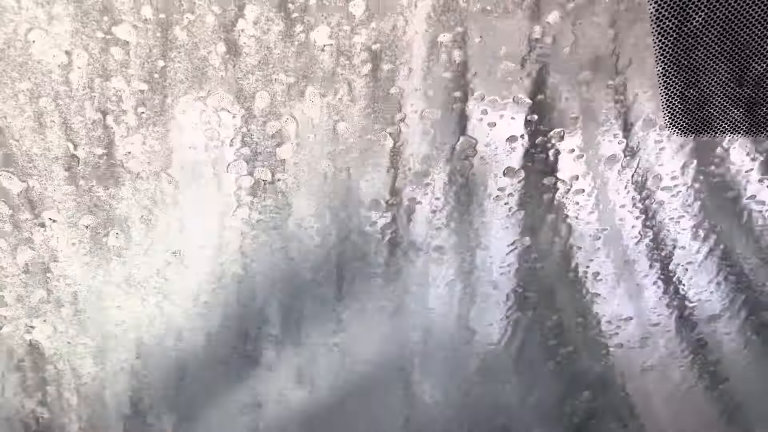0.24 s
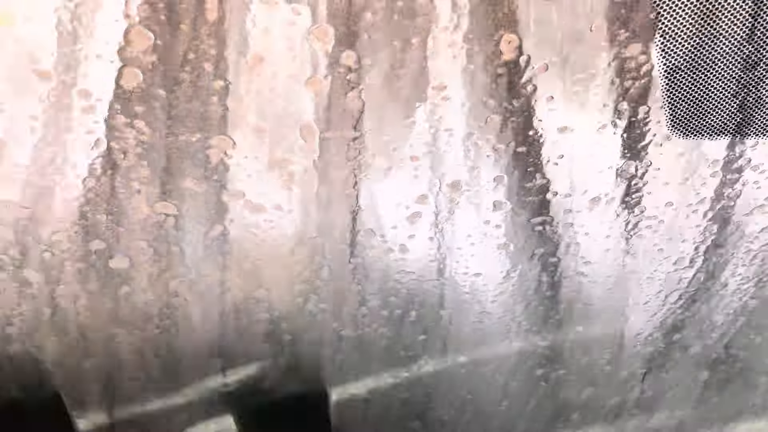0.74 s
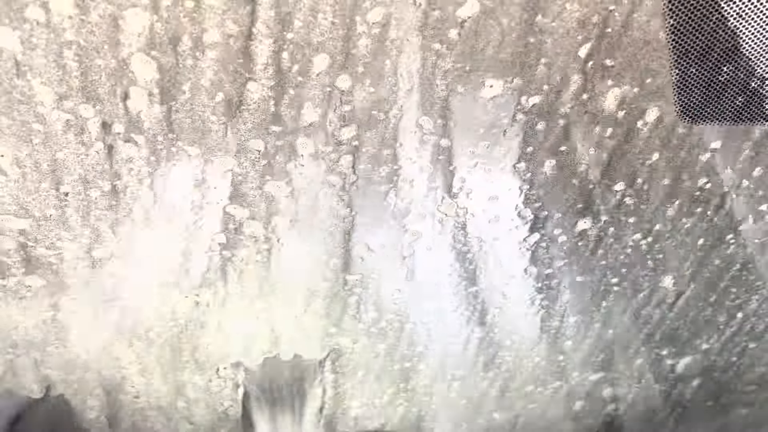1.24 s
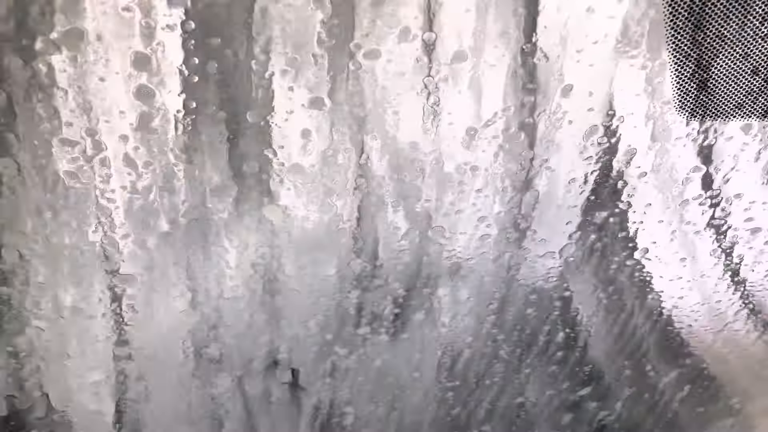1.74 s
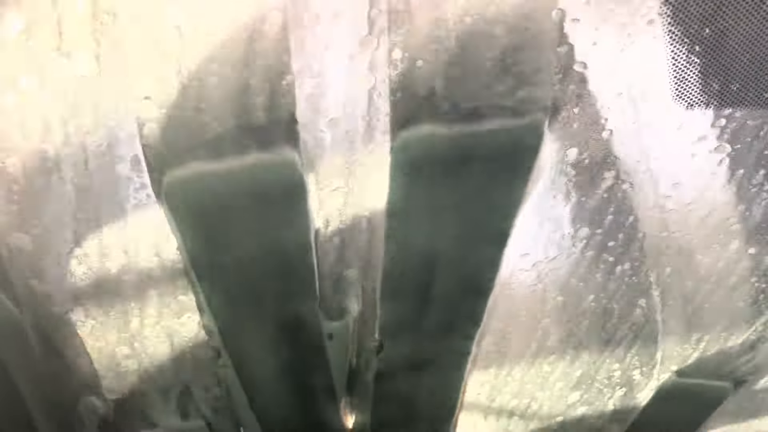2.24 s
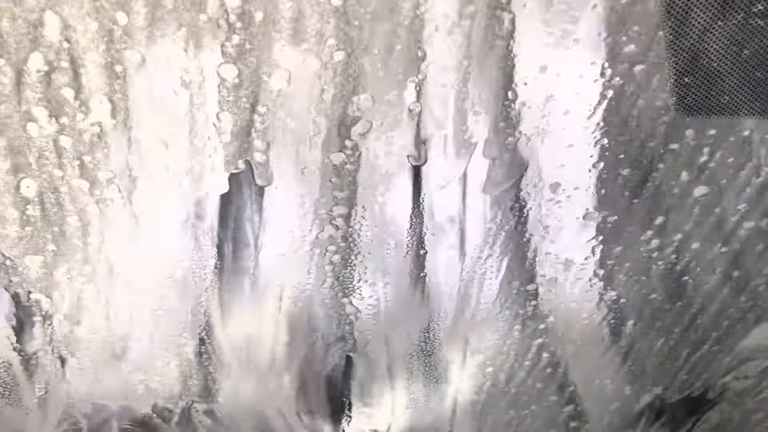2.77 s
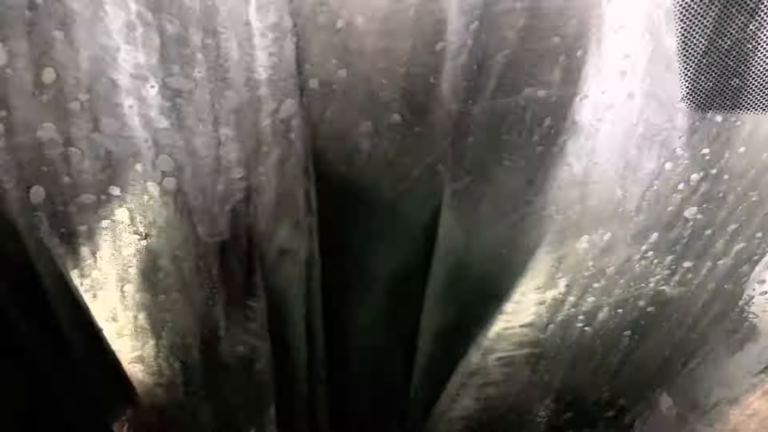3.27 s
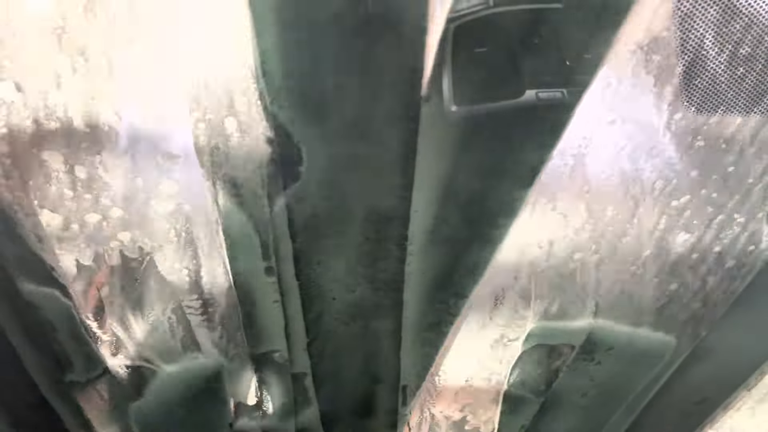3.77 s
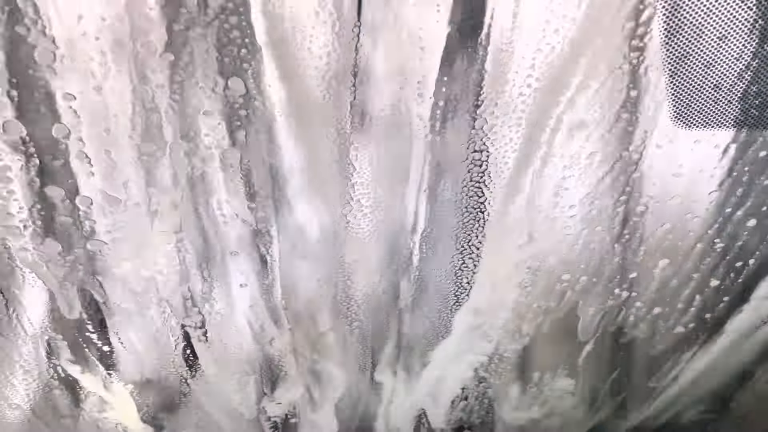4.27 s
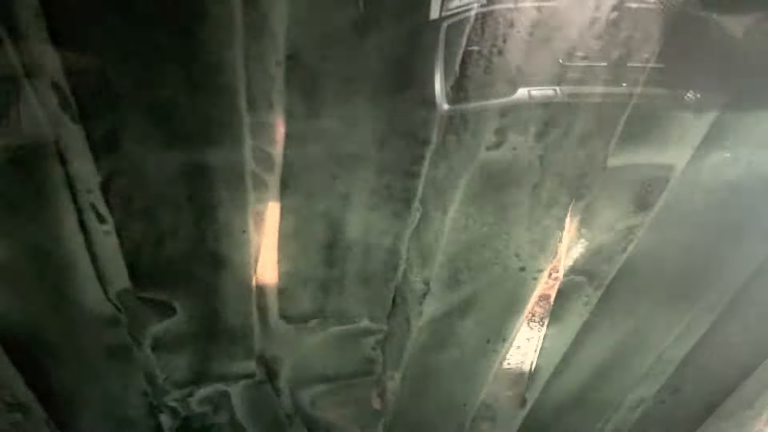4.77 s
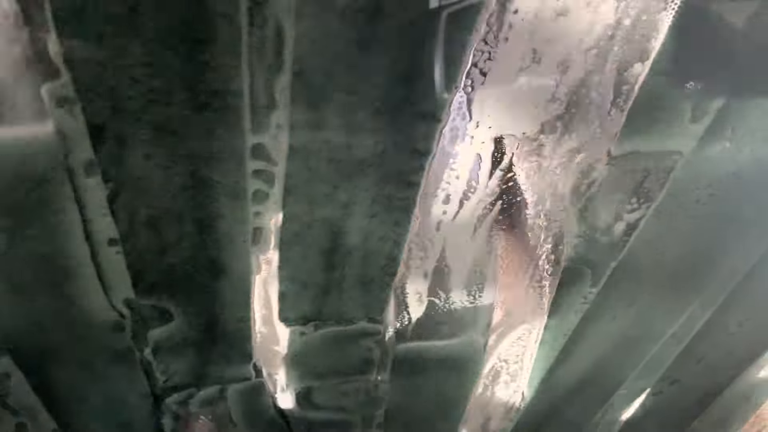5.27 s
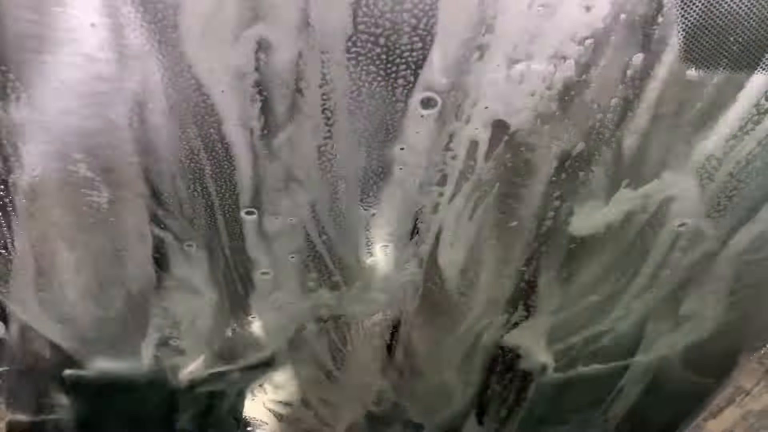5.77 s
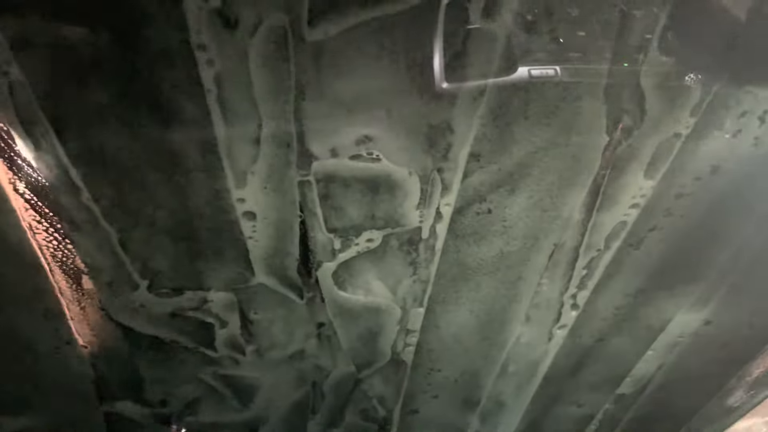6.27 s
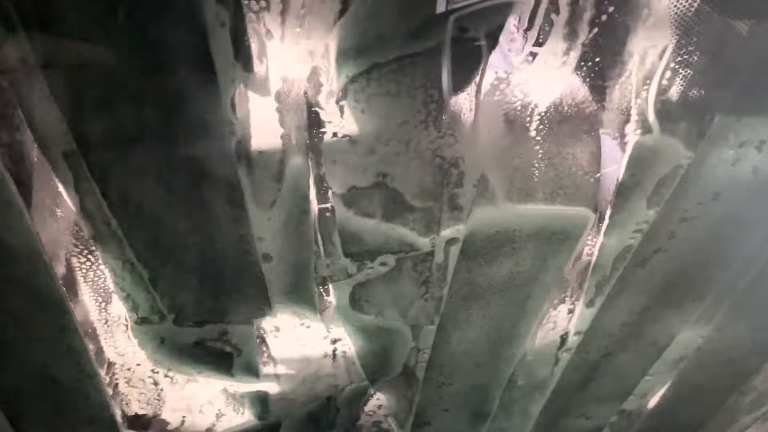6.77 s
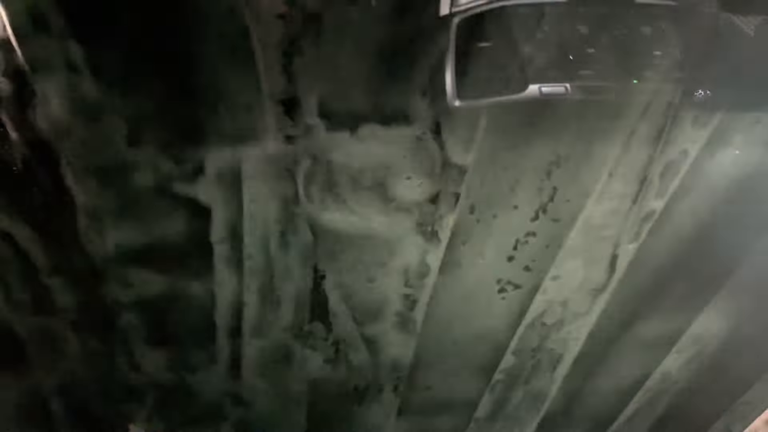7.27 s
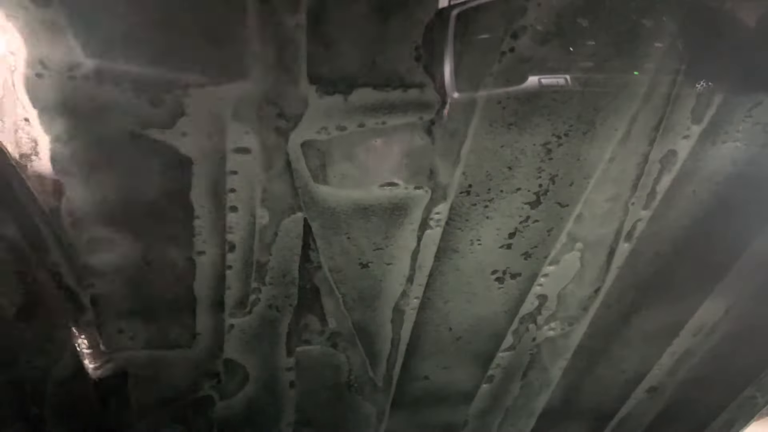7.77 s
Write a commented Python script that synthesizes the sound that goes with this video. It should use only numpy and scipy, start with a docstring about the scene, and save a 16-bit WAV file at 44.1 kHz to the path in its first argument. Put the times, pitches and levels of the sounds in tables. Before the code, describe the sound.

Wet cloth strips slap and thump irregularly on a car's windscreen and roof, heard from inside over low machinery rumble and faint water hiss.

```python
"""Inside a car in an automatic wash

Wet cloth strips slap the windscreen: swelling pops join noisy patter that is filtered by its resonances. They
thump on the roof, which rings in damped modes, then scrape and drag over the glass as shaped noise. Machinery
rumbles through the closed cabin as low noise, and the hiss of the water spray, also filtered noise, slowly
falls behind."""
import sys
import numpy as np
from scipy import signal
from scipy.fft import rfft, irfft
from scipy.io import wavfile
from scipy.ndimage import uniform_filter1d, minimum_filter1d

SR = 44100
rng = np.random.default_rng(int(sys.argv[2]) if len(sys.argv) > 2 else 0)


def generate_wav(signal):
    """Clip the signal to [-1, 1] and save it as 16-bit WAV at the path in sys.argv[1]."""
    frames = np.transpose(np.atleast_2d(signal))
    scaled = np.clip(frames, -1, 1) * 32767
    pcm = np.round(scaled).astype(np.int16)
    wavfile.write(sys.argv[1], SR, pcm)


N = 353726

# Machinery through the body shell, swelling as the curtain swings against the car.
# Each row: time in seconds, level in dB.
RUMBLE_LEVEL = [(0, -35.5), (.2, -36), (.5, -39), (.95, -31), (1.25, -34), (1.5, -32), (1.8, -36.5),
                (2.2, -32), (2.75, -33), (3.15, -35), (3.5, -36), (3.85, -35), (4.15, -34), (5.1, -32.5),
                (5.4, -37), (6.1, -27.5), (6.7, -36.5), (7.1, -31.5), (7.55, -30.5), (8.02, -36)]
# Colour of the rumble. Each row: frequency in Hz, relative level in dB.
RUMBLE_COLOUR = [(15, -42), (24, -20), (32, -22.5), (41, 1), (50, 1), (62, -3), (76, -2), (100, -7.5),
                 (125, -4), (152, -5), (180, -12), (225, -23.5), (300, -24.5), (600, -83.5)]
# The curtain's weight rocks the whole body, which shudders on.
# Each row: start in seconds, level in dB before the rise and decay.
SHUDDERS = [(.03, -25), (2.02, -19), (2.39, -18), (3.31, -10), (3.37, -17), (3.68, -25), (4.26, -22),
            (4.61, -14), (4.95, -15.5), (5.12, -21.5), (5.95, -21.5), (6.26, -23.5), (6.79, -24),
            (7.27, -14), (7.35, -31), (7.61, -22.5)]
# Water spray, falling behind. Each row: time in seconds, relative level in dB.
SPRAY_LEVEL = [(0, -54), (.62, -53.5), (.95, -57.5), (4.5, -58), (6.3, -61), (6.75, -59.5), (8.02, -59)]
# Colour of the spray. Each row: frequency in Hz, relative level in dB.
SPRAY_COLOUR = [(1500, 1), (2600, -3), (3600, -4), (4500, 0), (5200, -2.5), (5480, -6.5), (5740, -16.5),
                (5880, -2), (6400, -5), (6950, -5), (7200, -12), (7780, -16.5), (8020, -9), (8900, -11.5),
                (9700, -20), (12000, -45)]
# Colour of the fine mist. Each row: frequency in Hz, relative level in dB.
MIST_COLOUR = [(7000, -31.5), (9500, 8.5), (11500, 8.5), (13000, 3.5), (15000, 9.5), (16000, -5.5)]
# Passing jets. Each row: loudest moment in seconds, level in dB, width (standard deviation) in seconds.
JETS = [(.085, -55, 0.035), (.605, -52, .017)]
# Cloth dragging over the glass. Each row: time in seconds, relative level in dB.
DRAG_LEVEL = [(0, -40.5), (.55, -43), (1.05, -41), (1.8, -43), (3.0, -44), (5.05, -43.5), (5.45, -43.5),
              (6.7, -43.5), (7.6, -45.5), (8.02, -45.5)]
# Colour of the drag. Each row: frequency in Hz, relative level in dB.
DRAG_COLOUR = [(110, -67), (180, 1), (200, -11.5), (227, -6.5), (363, -3.5), (450, -10), (626, -10),
               (712, -11.5), (960, -12.5), (1290, -19), (1550, -15.5), (1900, -25.5), (4000, -29.5),
               (5200, -48.5), (8800, -120)]
# Colour of the door and roof panels. Each row: frequency in Hz, relative level in dB.
PANEL_COLOUR = [(70, -31), (110, -2.5), (200, -7.5), (270, -8.5), (380, -5.5), (520, -13.5), (800, -22),
                (1500, -61)]
# A strip's weight falls on the roof.
# Each row: start in seconds, level in dB, frequency driven hardest in Hz.
THUMPS = [(.045, -20.5, 61.6), (0.073, -28.5, 188), (0.122, -25, 52), (.712, -12, 211), (0.729, -7.5, 122),
          (1.15, -27.5, 165), (1.436, -21, 129), (1.957, -11, 190.5), (2.003, -10, 107), (2.035, -12, 161),
          (2.071, -13, 88), (2.403, -12, 86.7), (2.425, -18, 55), (2.76, -27.5, 60), (2.983, -25.5, 126),
          (3.297, -8.5, 121), (3.312, -11.5, 112), (3.346, -5.5, 199), (3.363, -15.5, 96),
          (3.398, -15.5, 60), (3.678, -17.5, 112), (3.699, -16.5, 200), (4.034, -19, 69), (4.266, -17, 80),
          (4.35, -19.5, 120), (4.521, -19.5, 67.7), (4.601, -15, 167), (4.633, -10.5, 70), (4.711, -17, 93),
          (4.959, -10, 60), (4.972, -18, 139), (5.125, -27, 131), (5.129, -16.5, 79.4), (5.685, -25.5, 99),
          (5.774, -23.5, 120), (5.895, -15, 165), (6.015, -21.5, 95.3), (6.238, -18.5, 105),
          (6.299, -20, 50.4), (6.8, -22, 94.5), (7.056, -31.5, 196), (7.235, -15.5, 133), (7.322, -10, 178),
          (7.353, -21, 75), (7.466, -22, 109), (7.604, -16.5, 153), (7.628, -18, 53.5), (7.671, -24, 99),
          (7.765, -19.5, 109.5)]
# Modes of the roof and the cabin air.
# Each row: mean frequency in Hz, relative level in dB, 60 dB decay time in seconds.
ROOF_MODES = [(50.5, -25, 0.5), (60, -13.5, 1), (73, -12, 0.67), (88.9, 2, 0.4), (118.6, -1, 0.24),
              (150.4, 3.5, 0.38), (175, 8.5, 0.11), (199, -7, 0.066), (225, -1, 0.086)]
# A wiping strip squeezes out a crackle of water.
# Each row: loudest moment in seconds, level in dB, width (standard deviation) in seconds.
SQUIRTS = [(2.003, -41, 0.0065), (3.316, -32, 0.005), (3.374, -37, 0.0089), (3.70, -59, 0.015),
           (4.63, -40, .018), (4.955, -53, 0.013), (5.05, -47.5, 0.0086), (5.082, -51, 0.0065),
           (5.124, -40, 0.0046), (5.68, -60, .012), (5.876, -53, 0.0056), (5.903, -46, 0.012),
           (7.194, -51, .008), (7.325, -44, 0.025), (7.59, -52.5, 0.025)]
# Colour of that crackle. Each row: frequency in Hz, relative level in dB.
SQUIRT_COLOUR = [(800, -30), (1700, -1), (2200, 5), (2800, -3.5), (3600, -1.5), (4800, -10), (6000, -21),
                 (9000, -41)]
# A strip scrapes along the glass.
# Each row: loudest moment in seconds, relative level in dB, width (standard deviation) in seconds.
SCRAPES = [(.08, -40.5, 0.035), (.735, -40, 0.015), (.91, -48, 0.026), (2.01, -28, 0.02),
           (2.405, -28.5, 0.019), (3.31, -22, 0.019), (3.377, -27.5, 0.0091), (3.691, -35, 0.041),
           (4.604, -29, 0.019), (4.645, -30.5, 0.012), (4.72, -34.5, 0.053), (4.96, -33, 0.018),
           (5.06, -38.5, 0.051), (5.682, -38, 0.013), (5.875, -35, 0.0077), (5.912, -26.5, 0.019),
           (5.982, -47, 0.0081), (6.025, -37.5, 0.071), (6.28, -32, 0.019), (6.45, -43.5, 0.032),
           (6.91, -41.5, 0.031), (7.07, -54, 0.02), (7.197, -30, 0.012), (7.25, -33.5, 0.019),
           (7.315, -29.5, 0.02), (7.385, -36, 0.013), (7.585, -36.5, 0.015), (7.68, -39, 0.037)]
# Colour of a scrape. Each row: frequency in Hz, relative level in dB.
SCRAPE_COLOUR = [(150, -30), (250, -13.5), (360, 3.5), (520, -1.5), (730, -1), (880, -0.5), (1120, -8.5),
                 (1320, -16), (1550, -11.5), (1850, -18.5), (2700, -19), (4000, -25.5), (5500, -32),
                 (9000, -48), (15000, -58)]
# A strip lands on the glass. Each row: start in seconds, clap level in dB, clap pitch in Hz,
# knock level of the pane in dB, knock pitch in Hz, wet smack level in dB, smack pitch in Hz,
# relative time to lie flat in seconds, left-right difference in dB.
SLAPS = [(.7072, -19, 920, -20, 388, -38, 2380, .0035, 10),
         (.7122, -9.5, 750, -10.5, 387, -29, 3560, 0.0019, 6.5),
         (.7252, -12, 637, -16, 423, -31.5, 2680, 0.0035, 5),
         (.808, -29.5, 755, -42, 370, -39.5, 2920, 0.0026, 4),
         (1.107, -26.5, 940, -27, 330, -45, 1500, 0.0068, -1),
         (1.495, -34.5, 710, -30.5, 370, -48, 1600, .006, -4),
         (1.9555, -12, 1115, -12, 416, -25, 2640, 0.0042, 4),
         (1.9725, -15.5, 594, -18, 378, -46, 1500, 0.0017, 9.5),
         (1.988, -37, 800, -33, 370, -37, 1980, 0.0022, 6), (1.999, -29, 700, -26, 355, -40, 3670, .007, 6),
         (2.0305, -17, 644, -6.5, 363, -27, 2220, 0.0032, 4),
         (2.063, -20, 960, -16.5, 387, -29, 3220, 0.0096, 2.5),
         (2.1, -26, 660, -29, 370, -46, 1500, 0.0035, 4),
         (2.384, -24.5, 880, -19.5, 356, -40, 1520, 0.01, -2),
         (2.399, -30, 1030, -27, 367, -40, 1500, .0028, 2),
         (2.424, -26, 613, -21, 370, -42, 1500, 0.0057, -1),
         (3.269, -36.5, 743, -27, 370, -63, 1500, 0.01, 8),
         (3.3082, -9, 720, -9.5, 398, -32, 2720, 0.0024, 3.5),
         (3.3145, -14.5, 650, -20, 371, -27, 1550, 0.0018, 7),
         (3.339, -22, 800, -24, 394, -31, 1770, .002, 4),
         (3.3435, -14.5, 743, -14, 343, -27.5, 2220, 0.0053, 7),
         (3.3698, -20.5, 850, -17, 353, -25.5, 2660, 0.0017, 4),
         (3.379, -32, 610, -20, 370, -32.5, 3400, .003, 1.5),
         (3.663, -30, 900, -23, 244, -39, 1490, 0.0093, 7),
         (3.678, -34, 800, -26, 370, -48, 2080, 0.0047, -5),
         (3.703, -21, 880, -21.5, 355, -34.5, 1950, 0.0086, -1),
         (4.586, -21.5, 986, -25.5, 437, -31.5, 1500, 0.0044, 6),
         (4.605, -36, 710, -21, 225, -53, 1600, .004, 3),
         (4.622, -21, 617, -15, 402, -30, 2740, 0.0024, 4.5),
         (4.628, -26, 790, -14.5, 374, -41, 2230, .0025, -3),
         (4.641, -31, 850, -31, 400, -41, 2230, .003, 2), (4.655, -33, 800, -37, 380, -38, 2600, .002, 7),
         (4.684, -32, 950, -29, 370, -43, 2200, 0.0042, 7),
         (4.715, -28.5, 667, -24, 340, -39, 2230, 0.0038, 6),
         (4.745, -26, 720, -22, 370, -48, 2670, 0.01, 4),
         (4.94, -25, 735, -22.5, 262, -38, 2200, 0.016, -2),
         (4.969, -26, 900, -22, 220, -38.5, 2370, 0.0035, -3),
         (5.12, -16, 550, -16.5, 340, -33, 1780, 0.0026, 0.5),
         (5.534, -29, 650, -53, 370, -37, 1350, 0.0049, 5),
         (5.677, -31, 846, -34, 370, -45, 2420, 0.014, 3),
         (5.889, -19.5, 540, -23.5, 433, -32, 1980, 0.0072, 6),
         (5.911, -24, 640, -19.5, 473, -45, 1610, 0.0076, 8),
         (5.933, -25, 980, -20, 333, -30.5, 1490, .005, 4),
         (5.958, -27, 550, -35, 456, -32.5, 1440, 0.0029, 5),
         (6.012, -21.5, 726, -16.5, 347, -34, 2390, .009, 3.5),
         (6.03, -25, 740, -43, 385, -31, 1530, .004, 4.5),
         (6.259, -41, 1065, -27, 410, -36.5, 1710, 0.0046, 2),
         (6.279, -43, 1100, -27, 435, -34, 2770, 0.0044, 5),
         (6.435, -35, 960, -30.5, 370, -56, 1580, 0.0068, -2),
         (6.459, -35, 694, -36, 370, -61, 1580, .003, -4),
         (6.672, -23.5, 624, -33, 370, -66, 1490, 0.0015, 7),
         (6.84, -40, 800, -46, 370, -43, 2870, .003, 5), (6.992, -41, 875, -39, 370, -57, 1600, .003, 2),
         (7.039, -28, 737, -32, 360, -45, 1500, 0.015, 6.5),
         (7.068, -28, 560, -23, 437, -62, 1580, 0.016, 5),
         (7.117, -38, 1020, -40, 370, -50, 1630, .0027, 3),
         (7.189, -22.5, 726, -23, 387, -36, 2300, 0.0085, 3),
         (7.233, -24, 650, -38, 232, -31.5, 1600, 0.0066, 8),
         (7.296, -28, 592, -17, 225, -44, 1450, 0.0095, 4),
         (7.3225, -28, 720, -8, 333, -41, 2400, 0.0017, 3.5),
         (7.384, -34, 930, -36, 370, -38, 2600, .003, 5),
         (7.392, -26.5, 756, -40, 370, -44, 2300, 0.0017, 4),
         (7.455, -34, 834, -40, 370, -59, 1500, 0.0025, 2),
         (7.54, -42, 748, -27, 232, -37.5, 1890, 0.0033, 5),
         (7.572, -54, 600, -33, 370, -39, 2200, 0.0085, 3),
         (7.597, -34, 1044, -30, 443, -39.5, 1650, 0.0089, 3),
         (7.659, -38, 700, -40, 370, -48, 3530, 0.0033, 2),
         (7.678, -38, 975, -19, 303, -44, 2720, 0.0055, 1),
         (7.703, -42, 1000, -32, 370, -52, 1710, 0.005, 1),
         (7.757, -28.5, 960, -39, 370, -50, 1480, 0.0082, -1)]
# Colour of the struck windscreen. Each row: frequency in Hz, relative level in dB.
GLASS_COLOUR = [(120, -29), (200, 3.5), (279, -0.5), (372, -3), (512, -14), (738, -3.5), (852, -15),
                (1150, -24.5), (1310, -35), (1490, -24.5), (1800, -36), (2640, -35.5), (5580, -49),
                (6140, -52.5), (9000, -79.5), (11700, -102.5), (19800, -120)]
# Windscreen resonances. Each row: frequency in Hz, width in Hz, boost in dB.
PANE_RESONANCES = [(353, 17, 6), (720, 430, -8.5), (1255, 130, 7), (1627, 71, 5.5), (2020, 61, 11),
                   (2690, 270, 0)]
# Likeness of the two microphones. Each row: frequency in Hz, correlation from -1 to 1.
MICROPHONE_LIKENESS = [(40, 1), (100, 0.92), (250, 0.69), (500, 0.13), (1000, -0.1), (2000, -0.046),
                       (4000, 0.0012), (8000, 0.038), (9500, -0.75), (11000, -0.37), (12500, .99)]

SHUDDER_RISE_S, SHUDDER_FALL_S = 0.022, 0.059
MIST_DB, MIST_DB_PER_S = -65, -.5  # mist at the start, and how it thins with distance
# Drag after a slap, in dB relative to its clap before the rise and decay.
TRAIL_DB, TRAIL_RISE_S, TRAIL_FALL_S = -30, 0.015, 0.069
# Panel buzz after a thump, in dB relative to it before the rise and decay.
BUZZ_DB, BUZZ_RISE_S, BUZZ_FALL_S = -20, 0.003, 0.059
LOW_CUT_HZ = 30.6  # the thumps are cut below this
# Light flaps of loose ends: clap level, then knock and smack relative to it.
FLAPS_PER_S, FLAP_DB, FLAP_KNOCK_DB, FLAP_SMACK_DB = 3, -44.5, -2, -13.5
FLAP_HZ, FLAP_KNOCK_HZ, FLAP_SMACK_HZ = 800, 370, 1710  # the clap pitch is the median
FLAP_FLAT_S = 0.0014  # relative time to lie flat
KNOCK_LATE_S = 0.0013  # the heavy pane answers just after the clap
FIRM_S = .006  # time to lie flat that sets the scale for patter against pop
SAG = 0.051  # a pop starts this share above its pitch and falls towards this share below
EDGE_HZ = 15800  # upper band limit


def gain_of(db):
    """Level law: decibels to amplitude."""
    return 10 ** (np.asarray(db) / 20)


def evened(x):
    """Normalisation to an rms of 1."""
    return x / np.sqrt(np.mean(x ** 2) + 1e-20)


def read(points, hz):
    """Interpolation of a spectrum on a log-frequency axis."""
    f, value = np.transpose(points)
    return np.interp(np.log(hz + 1), np.log(f + 1), value)


def level(rows):
    """Interpolation of a level curve in dB, as a gain for every sample."""
    times, db = np.transpose(rows)
    return gain_of(np.interp(np.arange(N) / SR, times, db))


def add(mix, s, sound):
    """Superposition: a stereo sound joins the mix at time s."""
    part = mix[:, max(round(s * SR), 0):][:, :sound.shape[1]]
    part += sound[:, :part.shape[1]]


def panned(db):
    """Interaural level difference: left and right gains that differ by db."""
    return gain_of([[db / 2], [-db / 2]])


def swells(rows, t):
    """Gaussian envelopes: a bell-shaped rise and fall of gain for every row."""
    return sum(gain_of(db) * np.exp(-.5 * ((t - s) / width) ** 2) for s, db, width in rows)


def aftermath(rows, rise_s, fall_s):
    """Exponential rise and decay after every blow; overlapping blows add in power."""
    t = np.arange(0, N, 64) / SR
    power = np.zeros(len(t))
    for s, db, *_ in rows:
        age = np.maximum(t - s, 0)
        power += (gain_of(db) * (1 - np.exp(-age / rise_s)) * np.exp(-age / fall_s)) ** 2
    return np.interp(np.arange(N) / SR, t, np.sqrt(power))


def causal(db):
    """Minimum phase: a response with these gains that rings only after the blow."""
    log_gain = np.log(gain_of(np.r_[db, db[-2:0:-1]]))
    return np.exp(signal.hilbert(log_gain).conj())[:len(db)]


def band(x, lo_hz, hi_hz):
    """Causal band-pass filtering."""
    return signal.sosfilt(signal.butter(3, [lo_hz, hi_hz], "band", fs=SR, output="sos"), x)


def noise(colour, patchy_db, flicker_db, ripple_db, size=1024):
    """Spectral shaping of partly correlated stereo noise: drifting patches, a flicker shared by
    all frequencies and the fixed ripple of the cabin's reflections."""
    frames, hz = N // (size // 4) + 5, np.fft.rfftfreq(size, 1 / SR)
    a, b, c, d, patches = rng.standard_normal((5, frames, len(hz)))
    patches = uniform_filter1d(patches, size=6, axis=0)  # smooth in time
    patches = evened(uniform_filter1d(patches, size=7, axis=1))  # and in frequency
    flicker = evened(uniform_filter1d(rng.standard_normal(frames), size=3))[:, None]
    ripple = uniform_filter1d(rng.standard_normal(len(hz) + 1), size=3)
    ripple = evened(np.diff(ripple)) * hz / (hz + 1000)  # weaker at low frequencies
    same = np.clip(read(MICROPHONE_LIKENESS, hz), -1, 1)
    left = a + 1j * b
    right = same * left + np.sqrt(1 - same ** 2) * (c + 1j * d)
    spectrum = np.array([left, right])
    spectrum *= gain_of(read(colour, hz) + patchy_db * patches + flicker_db * flicker + ripple_db * ripple)
    sound = signal.istft(spectrum.transpose(0, 2, 1), nperseg=size, noverlap=size - size // 4)[1]
    return evened(sound[:, :N])


def windscreen(x):
    """Resonant filtering: a short sound takes on the glass colour and its resonances."""
    hz = np.fft.rfftfreq(x.shape[1], 1 / SR)
    db = read(GLASS_COLOUR, hz)
    for f, width, peak in PANE_RESONANCES:
        db = db + peak / (1 + (2 * (hz - f) / width) ** 2)
    return irfft(rfft(x) * causal(np.maximum(db, -90)))


def contact(t, rise_s, fall_s, cabin_db, cabin_t60, apart, crack):
    """Impact excitation: the cloth's edge patters in, cracks flat at t = 0 and settles; the cabin
    gives a short echo. The factor apart scales the part independent in each microphone."""
    shape = (3, len(t))  # one common part, two independent ones
    grains = rng.standard_normal(shape) * rng.exponential(1, shape) * (rng.random(shape) < .3)
    patter = grains * np.exp(-abs(t) / np.maximum(np.where(t < 0, rise_s, fall_s), .0003))
    patter /= np.linalg.norm(patter, axis=1, keepdims=True)
    patter[0, np.searchsorted(t, 0)] += crack
    echo = rng.standard_normal(shape) * gain_of(-60 * t / cabin_t60) * (t > 0)
    blow = patter + gain_of(cabin_db) * echo / np.linalg.norm(echo[0])
    lead = rng.integers(4, 21)  # samples by which the right microphone hears it later
    later = np.pad(blow[0], (lead, 0))[:len(t)]
    return windscreen(np.array([blow[0], later]) + apart * blow[1:])


def peaked(x, db):
    """Short-time power: sets a stereo sound's crest from its loudest few milliseconds."""
    power = uniform_filter1d(x.mean(0) ** 2, size=200)
    return gain_of(db) * x / np.sqrt(2 * power.max())


def rumble():
    """Forced vibration: motors and swinging curtains boom in the closed cabin; the heaviest
    blows leave the body shuddering."""
    boom = noise(RUMBLE_COLOUR, patchy_db=2.0, flicker_db=0.6, ripple_db=4.0, size=8192)
    shudder = aftermath(SHUDDERS, SHUDDER_RISE_S, SHUDDER_FALL_S)
    return np.hypot(level(RUMBLE_LEVEL), shudder) * boom * panned(2.5)


def spray():
    """Broadband radiation of many drops: water hisses on the shell with a fine mist above;
    a passing jet brightens it."""
    t, near = np.arange(N) / SR, level(SPRAY_LEVEL)
    water = noise(SPRAY_COLOUR, patchy_db=1.5, flicker_db=0.7, ripple_db=1.5)
    hiss = gain_of(4.5) * near * water
    jets = swells(JETS, t) * evened(band(water, 2600, 9900))
    fizz = noise(MIST_COLOUR, patchy_db=1.5, flicker_db=0.2, ripple_db=2)
    mist = gain_of(MIST_DB + MIST_DB_PER_S * t) * near / near[0]  # follows the hiss
    return (hiss + jets) * panned(2.3) + mist * fizz


def drag(ticks_per_s=70, spread_db=4):
    """Sliding friction: wet cloth rubs over the glass, harder after each slap; its folds and
    flung drops tick against the pane."""
    rub = noise(DRAG_COLOUR, patchy_db=2.2, flicker_db=0.8, ripple_db=3.5)
    chance, side = rng.random(N), rng.random(N)
    size = np.minimum(rng.exponential(1, N), 3)
    ticks = (chance < ticks_per_s / SR) * gain_of(spread_db * size) * np.array([side, 1 - side])
    t, kind, patter = np.arange(-256, 1792) / SR, rng.integers(0, 5, N), np.zeros((2, N))
    for k in range(5):  # five different tick sounds
        tick = contact(t, 0.00077, 0.0031, cabin_db=-1.0, cabin_t60=0.16, apart=0.84, crack=0.86)
        tick = evened(band(tick, 337, 5000))
        patter += signal.oaconvolve(ticks * (kind == k), tick, axes=1)[:, :N]
    trail = gain_of(TRAIL_DB) * aftermath(SLAPS, TRAIL_RISE_S, TRAIL_FALL_S)
    press = np.hypot(level(DRAG_LEVEL), trail)
    return press * (gain_of(1.0) * rub + gain_of(-15.5) * evened(patter)) * panned(0.14)


def panels():
    """Transient vibration: thin panels buzz briefly after every thump."""
    buzz = noise(PANEL_COLOUR, patchy_db=5.0, flicker_db=2.0, ripple_db=2.0)
    return gain_of(BUZZ_DB) * aftermath(THUMPS, BUZZ_RISE_S, BUZZ_FALL_S) * buzz * panned(4.2)


def thumps(rise_s=0.001, apart=0.39, off_db=10, bow_cycles=1.76, modes_db=-4.0):
    """Modal superposition: the roof bows for a few cycles where a strip lands, and its modes
    ring in a new mixture."""
    out, t = np.zeros((2, N)), np.arange(SR // 3) / SR
    hz, db, t60 = np.transpose(ROOF_MODES)[:, :, None]
    for s, peak_db, main_hz in THUMPS:
        place, detune, lean = rng.standard_normal((3, len(ROOF_MODES), 1))
        # drive weakens by off_db for each octave away from the frequency driven hardest
        drive_db = 2.0 * place - off_db * abs(np.log2(hz / main_hz))
        modes = gain_of(db + drive_db - 60 * t / t60) * np.sin(2 * np.pi * hz * (1 + 0.03 * detune) * t)
        modes *= rng.choice([-1, 1], hz.shape)
        ring = np.array([(modes * (1 + apart * lean)).sum(0), (modes * (1 - apart * lean)).sum(0)])
        bow = np.sin(2 * np.pi * main_hz * t) * np.exp(-main_hz * t / bow_cycles)
        bow *= 1 - np.exp(-2 * main_hz * t)
        blow = evened(bow) + gain_of(modes_db) * evened(ring)
        add(out, s, peaked(blow * (1 - np.exp(-t / rise_s)), peak_db))
    low_cut = signal.butter(4, LOW_CUT_HZ, "high", fs=SR, output="sos")
    return signal.sosfilt(low_cut, out) * panned(3.5)


def squirts(grain_db=2.0):
    """Film rupture: water bursts in tiny grains under the wiping cloth."""
    grain = evened(uniform_filter1d(rng.standard_normal(N), size=60))
    bursts = evened(gain_of(grain_db * grain))
    fizz = noise(SQUIRT_COLOUR, patchy_db=3.5, flicker_db=2.8, ripple_db=-0.5)
    return swells(SQUIRTS, np.arange(N) / SR) * bursts * fizz * panned(-1.5)


def scrapes(grain_db=1.5):
    """Stick-slip friction: wet cloth catches and slips in fine grains, swelling and fading as it
    passes; firmer strokes hold a larger share of wet sizzle."""
    t = np.arange(0, N, 32) / SR
    grain = evened(uniform_filter1d(rng.standard_normal(len(t)), size=5))
    slips = evened(gain_of(grain_db * grain))
    press, slips = (np.interp(np.arange(N) / SR, t, curve) for curve in (swells(SCRAPES, t), slips))
    rub = noise(SCRAPE_COLOUR, patchy_db=1.5, flicker_db=1.5, ripple_db=2.0)
    sizzle = evened(band(rub, 1500, 3900)) * press ** 1.3  # grows faster than the rub
    return slips * (gain_of(-1.5) * press * rub * panned(0.69) + gain_of(-23.0) * sizzle * panned(-1))


def flaps():
    """Poisson process: light flaps at random moments, clap pitches and sides, as rows like SLAPS."""
    rows = []
    for s in np.flatnonzero(rng.random(N) < FLAPS_PER_S / SR) / SR:
        place, side = rng.standard_normal(2)
        clap = (FLAP_DB, FLAP_HZ * np.exp(0.265 * place))
        knock = (FLAP_DB + FLAP_KNOCK_DB, FLAP_KNOCK_HZ)
        smack = (FLAP_DB + FLAP_SMACK_DB, FLAP_SMACK_HZ)
        rows.append((s, *clap, *knock, *smack, FLAP_FLAT_S, 3 + 1.8 * side))
    return rows


def pop(t, hz, swell_s, lag_rad):
    """Damped oscillation: a few cycles swell, sag in pitch as the cloth settles and die; the
    right microphone lags in phase."""
    age = np.maximum(t, 0) / swell_s
    turns = np.cumsum(hz * (1 + SAG * (2 * np.exp(-age / 2) - 1)) * (t > 0)) / SR
    phase = 2 * np.pi * (turns + rng.random()) - np.array([[0], [lag_rad]])
    return evened(age * np.exp(-age) * np.sin(phase))


def stroke(ring, patter, fall_s, grit, db):
    """Tone and noise in superposition: the slower a strip lies flat, the more it patters; grit is
    the least weight of patter."""
    return peaked(ring + np.hypot(grit, fall_s / FIRM_S) * evened(patter), db)


def slaps(rows, rise_s=0.0018):
    """Impact radiation: each strip squirts out its water, claps on the air trapped under it and
    knocks the pane at a pitch set by the place struck."""
    out, t = np.zeros((2, N)), np.arange(-512, 3584) / SR
    fade = signal.windows.tukey(len(t), .2)
    for s, clap_db, clap_hz, knock_db, knock_hz, smack_db, smack_hz, fall_s, pan_db in rows:
        knock = contact(t, rise_s * 0.5, fall_s * 3.7, cabin_db=-6.5, cabin_t60=0.15, apart=0.68, crack=1.04)
        knock = band(knock, 127, 520)
        clap = contact(t, rise_s * 0.5, fall_s * 1.7, cabin_db=-0.5, cabin_t60=0.09, apart=0.79, crack=1.0)
        clap = band(clap, 444, 1060)
        smack = contact(t, rise_s * 1.9, fall_s * 0.4, cabin_db=6.0, cabin_t60=0.08, apart=0.65, crack=1.0)
        smack = band(smack, 1110, 2 * smack_hz)
        knock_pop = pop(t - KNOCK_LATE_S, knock_hz, swell_s=0.0036, lag_rad=0.65)
        clap_pop = pop(t, clap_hz, swell_s=.0017, lag_rad=1.5)
        smack_pop = pop(t, smack_hz, swell_s=0.00087, lag_rad=1.74)
        knock = stroke(knock_pop, knock, fall_s, grit=.45, db=knock_db)
        clap = stroke(clap_pop, clap, fall_s, grit=.45, db=clap_db)
        smack = stroke(smack_pop, smack, fall_s, grit=1.9, db=smack_db)
        # the smack lies further right than the rest
        add(out, s + t[0], fade * panned(pan_db) * (knock + clap + smack * panned(-6.0)))
    return out


def scene():
    """Superposition of everything heard from the front seat."""
    background = rumble() + spray() + drag()
    roof = panels() + thumps()
    glass = squirts() + scrapes() + slaps(flaps()) + slaps(SLAPS)
    return background + roof + glass


def record(dry, ceiling=1.0):
    """Peak limiting and band limiting: a quick limiter holds peaks under full scale, then a
    low-pass filter sets the upper edge."""
    room = np.minimum(1, ceiling / (abs(dry).max(0) + 1e-9))
    held = dry * uniform_filter1d(minimum_filter1d(room, size=161), size=161)
    low_pass = signal.firwin(511, EDGE_HZ, window=("kaiser", 9), fs=SR)
    return signal.oaconvolve(held, low_pass[None], "same")


dry = scene()
out = record(dry)
generate_wav(out)
```